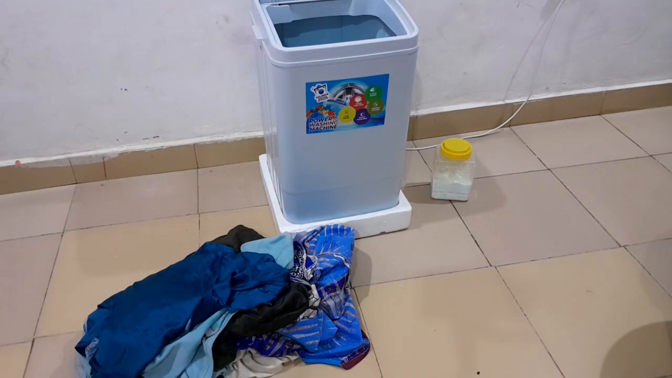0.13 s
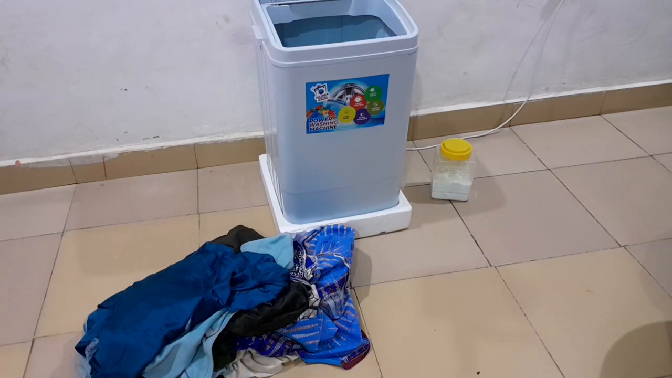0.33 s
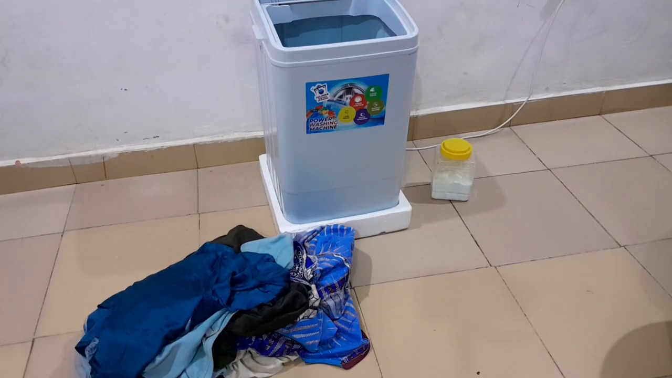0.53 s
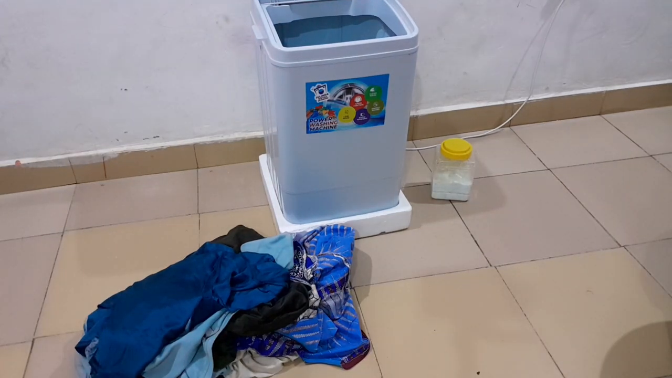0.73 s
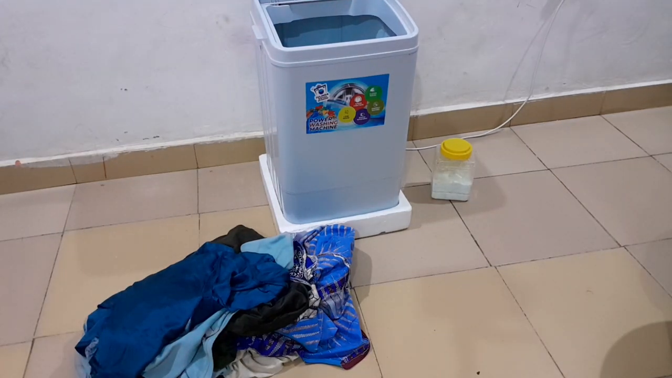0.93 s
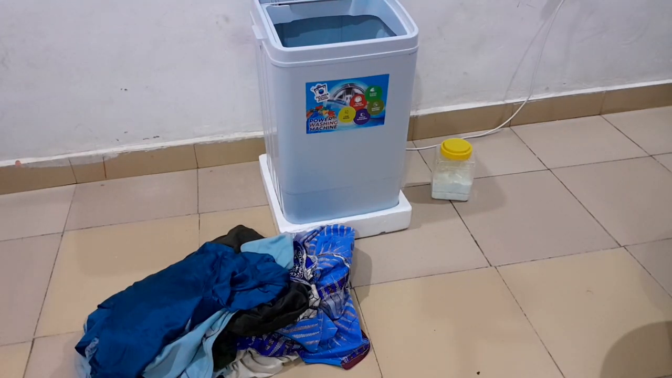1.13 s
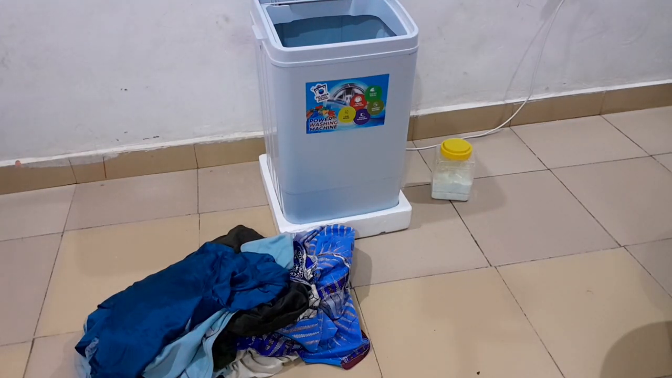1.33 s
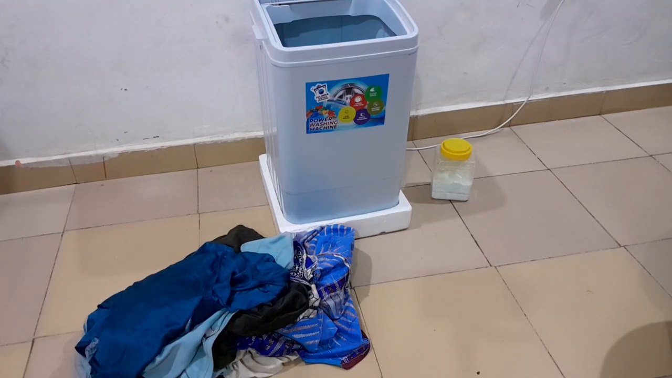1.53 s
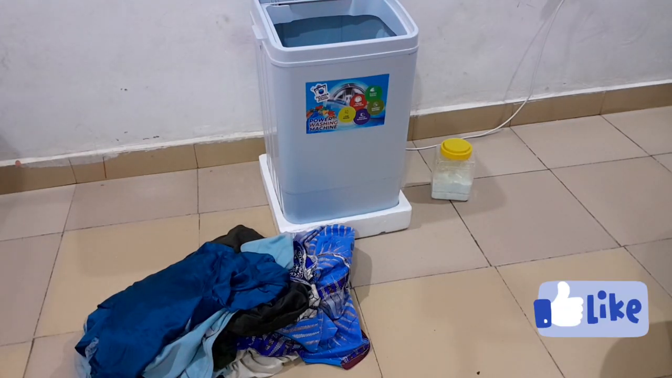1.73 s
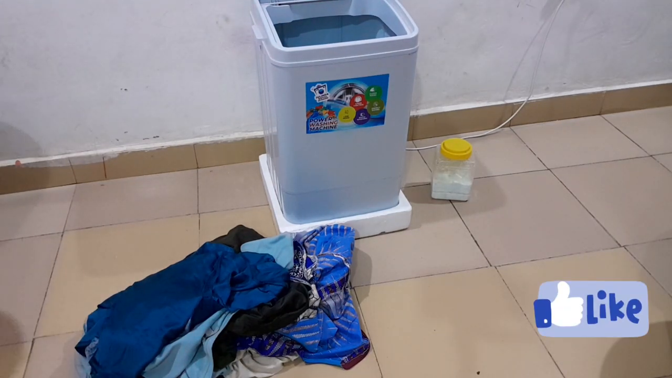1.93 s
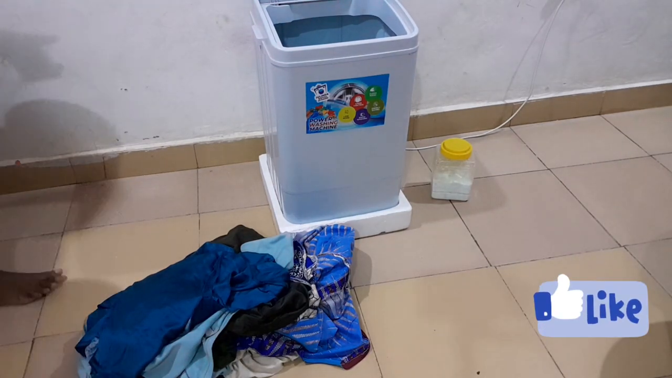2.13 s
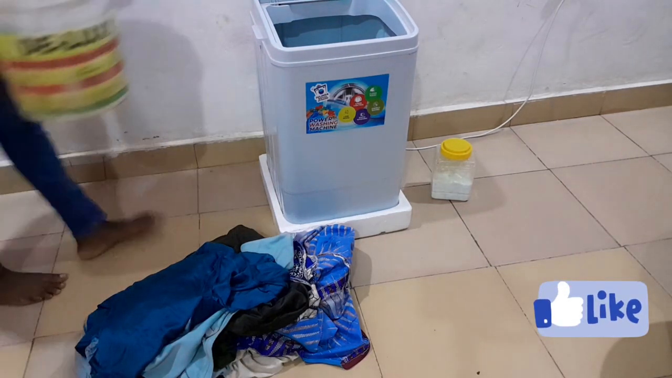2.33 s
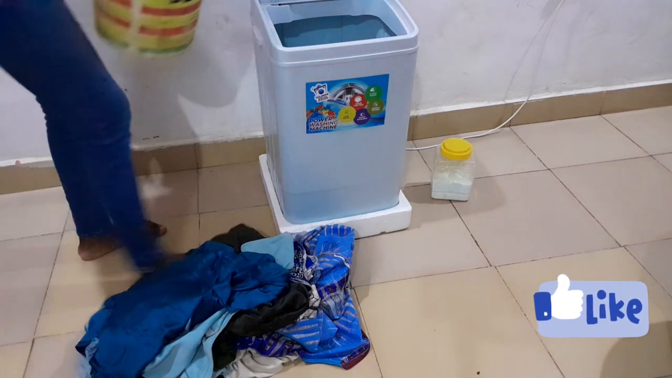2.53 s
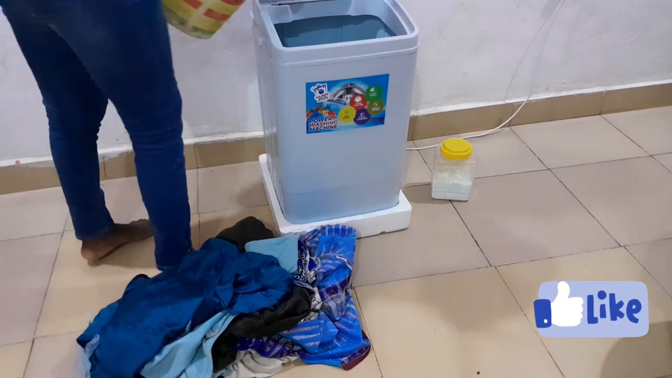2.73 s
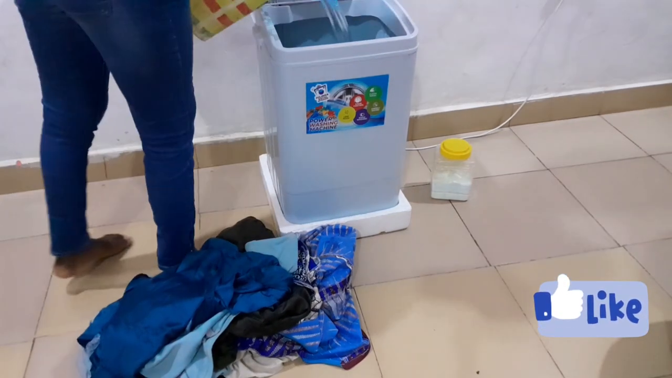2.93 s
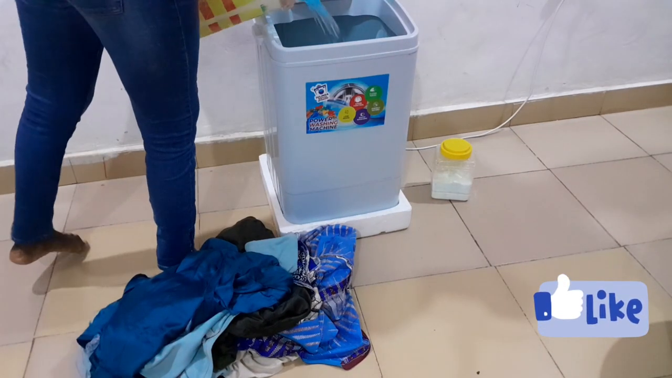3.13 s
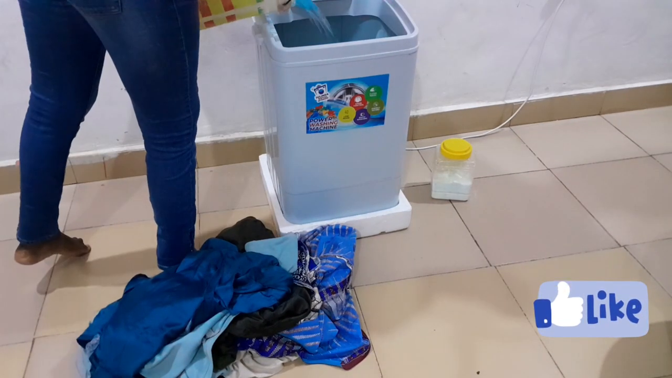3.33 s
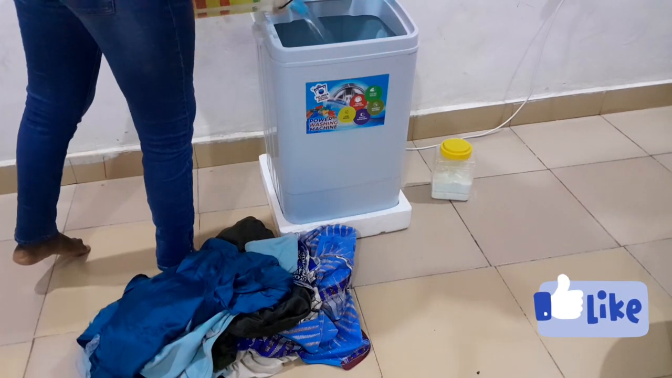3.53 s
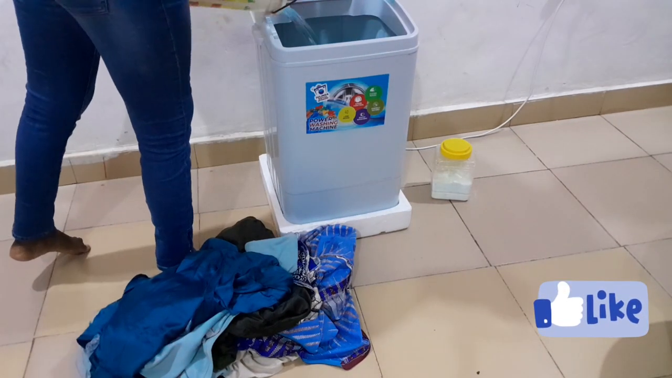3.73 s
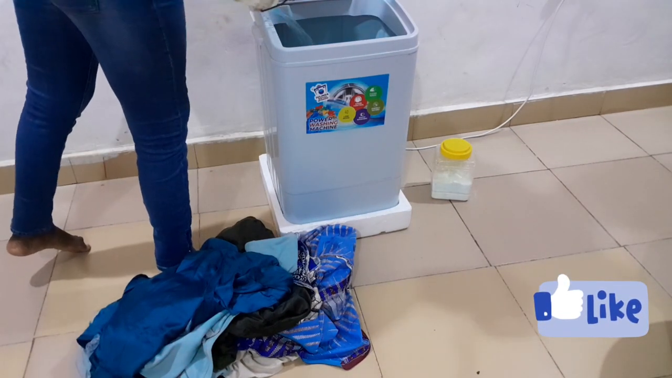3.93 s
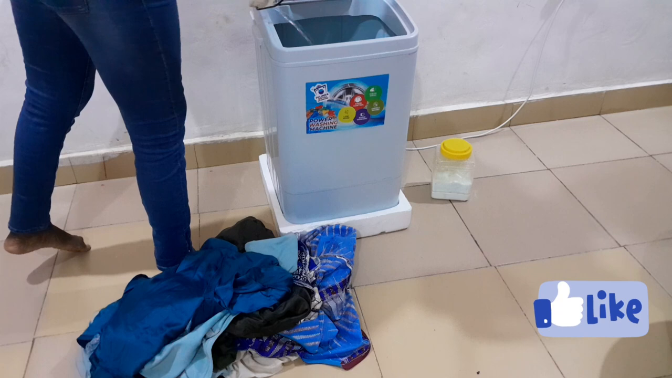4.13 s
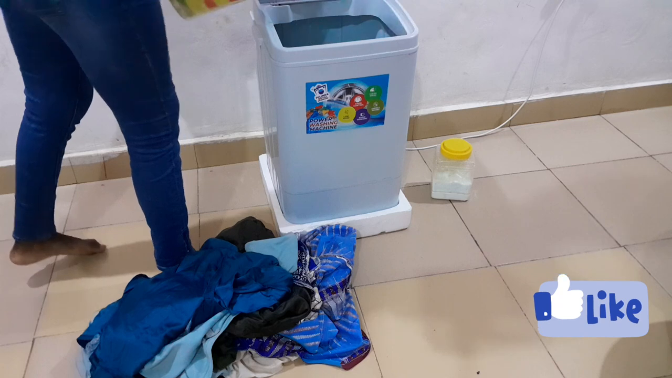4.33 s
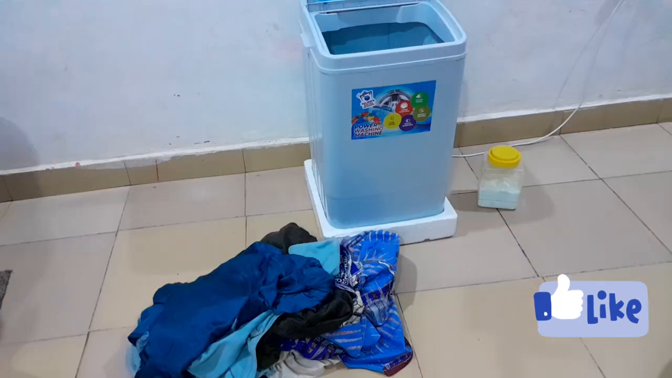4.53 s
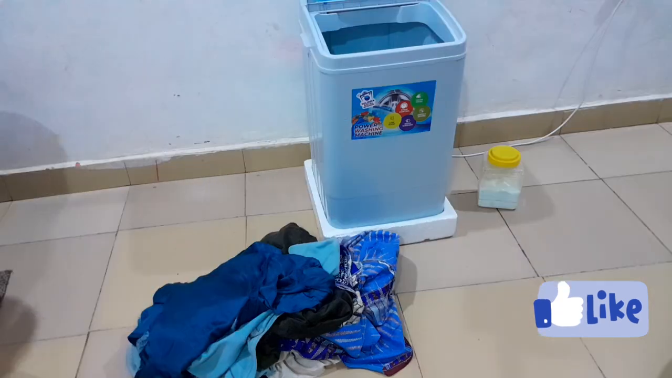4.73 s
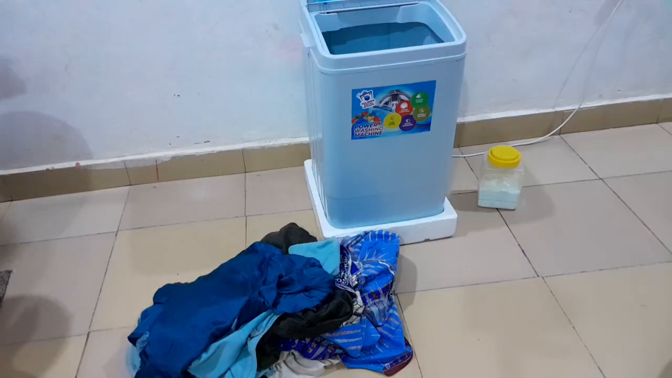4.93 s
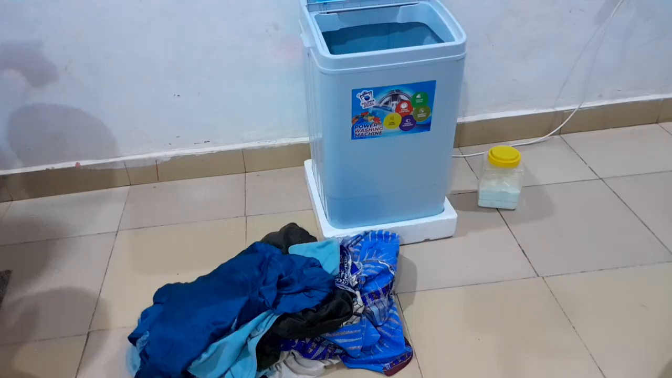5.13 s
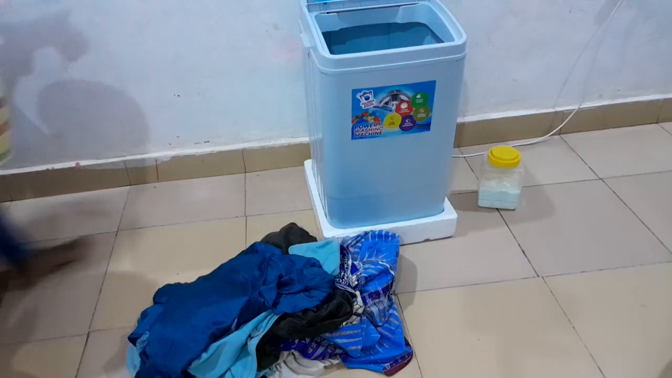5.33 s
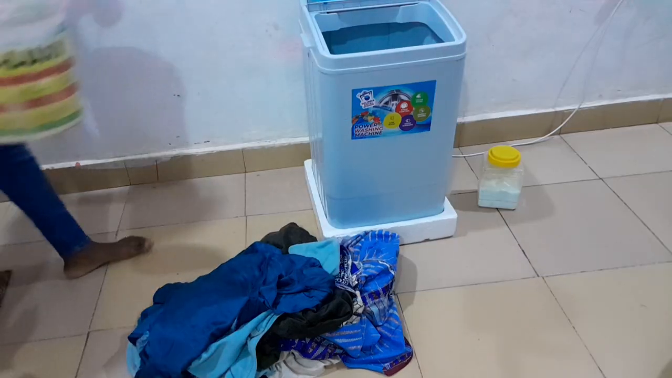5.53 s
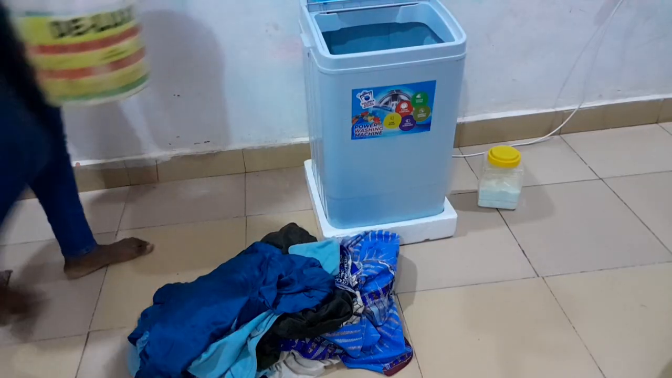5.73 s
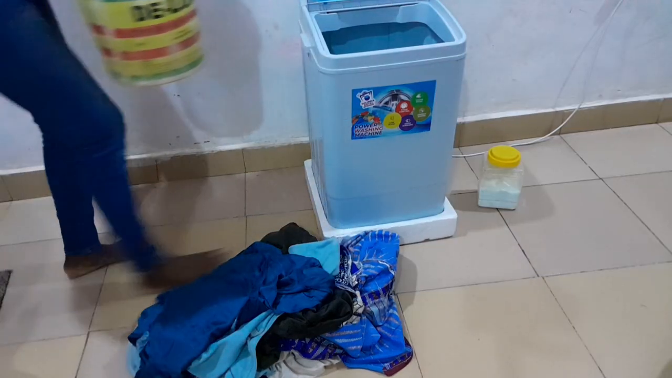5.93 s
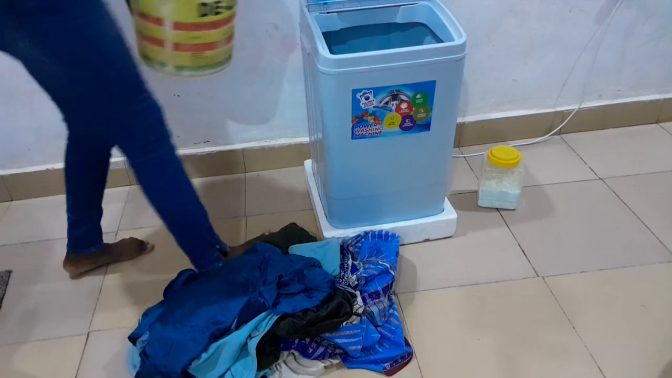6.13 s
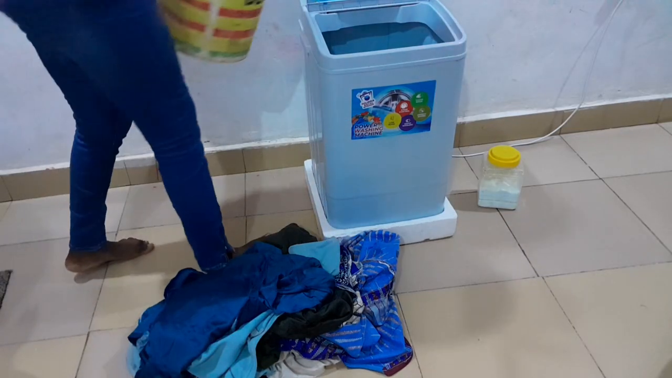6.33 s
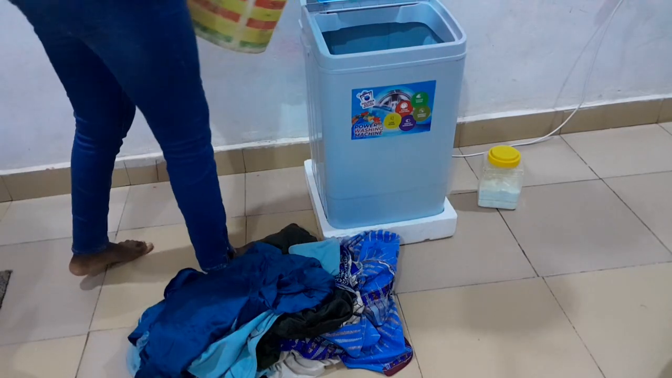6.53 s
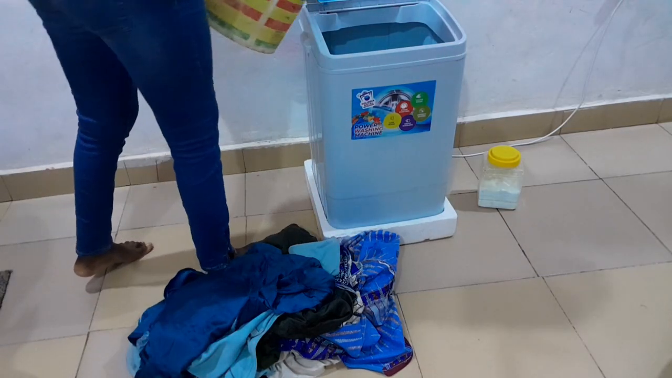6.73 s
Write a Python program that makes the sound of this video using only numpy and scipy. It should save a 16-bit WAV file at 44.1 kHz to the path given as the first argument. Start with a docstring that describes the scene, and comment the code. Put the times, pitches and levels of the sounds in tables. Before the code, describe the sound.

In an echoey tiled room, fabric rustles, water is quickly poured into a hollow washing tub, and the emptied bucket clatters before soft footsteps return.

```python
"""In a tiled room, a bucket of water is tipped into the plastic tub of a washing machine.
Before it, clothes brush by on the left (crackle, hiss and gliding harmonics), a scrape is heard
(filtered tiny slips) and bare feet thud on the floor (low swelling rings).
The pour is drumming, ringing bubbles and spray that follow one flow curve, with slaps and gulps.
Afterwards the bucket is scraped along and knocked about (noise bursts in its modes), and the steps return."""
import sys
import numpy as np
from scipy import signal
from scipy.fft import rfft, irfft, next_fast_len
from scipy.io import wavfile
from scipy.ndimage import map_coordinates

SR = 44100
rng = np.random.default_rng(int(sys.argv[2]) if len(sys.argv) > 2 else 0)


def pcm_store(signal):
    """Save signal as 16-bit PCM."""
    levels = np.round(np.clip(np.atleast_2d(signal), -1, 1) * 32767)
    wavfile.write(sys.argv[1], SR, levels.astype(np.int16).T)


N = 298557

# The stream swells at once and thins as the bucket empties, with one last surge.
# Each row: time in seconds, flow in dB.
FLOW = [(2.99, -43), (3.029, -1), (3.11, 0), (3.52, -0.5), (3.84, -2), (3.97, -11.5), (4.02, -5.5),
        (4.25, -10), (4.33, -18.5), (4.39, -18), (4.44, -33), (4.499, -33.5)]
# Stereo balance of sounds at the tub. Each row: frequency in Hz, left minus right in dB.
TUB_BALANCE = [(60, -3), (110, 0), (200, 0), (380, 2), (700, 2), (1290, 4.5), (2380, 4.5), (4400, 0.5),
               (8120, -2.5), (15000, -3.5)]
# Stereo balance of sounds close by on the left. Each row: frequency in Hz, left minus right in dB.
LEFT_BALANCE = [(60, 3), (110, 13), (200, 0), (380, 12), (700, 3), (1290, 4.5), (2380, 4.5), (4400, 1),
                (8120, -1.0), (15000, 0)]


def amp(db):
    """Decibels to gain."""
    return 10 ** (np.asarray(db) / 20)


def unit(x):
    """Scale to rms 1."""
    return x / np.sqrt(np.mean(x ** 2) + 1e-20)


def along(points, hz):
    """Read a curve of (Hz, value) points on a log frequency axis."""
    f, v = np.transpose(points)
    return np.interp(np.log(hz + 1), np.log(f + 1), v)


def levels(rows):
    """A (seconds, dB) curve per sample, silent outside the rows."""
    return np.interp(np.arange(N) / SR, *np.transpose(rows), left=-200, right=-200)


def wobble(rate):
    """A smooth random curve with rate knots a second."""
    knots = rng.standard_normal(int(N * rate / SR) + 4)
    return map_coordinates(knots, [np.arange(N) * rate / SR])


def filtered(x, response):
    """Multiply the spectrum of x by a complex response of frequency."""
    m = next_fast_len(N + SR // 2)
    return irfft(rfft(x, m) * response(np.fft.rfftfreq(m, 1 / SR)), m)[..., :N]


def coloured(x, spectrum):
    """Minimum-phase filter of unit energy, shaped by (Hz, dB) points."""
    size = 8192
    gain = amp(along(spectrum, np.fft.rfftfreq(size, 1 / SR)))
    # folding the cepstrum forward in time makes the filter causal
    cepstrum = irfft(np.log(np.maximum(gain, 1e-6)))
    cepstrum[1:size // 2] *= 2
    cepstrum[size // 2 + 1:] = 0
    kernel = irfft(np.exp(rfft(cepstrum)))
    kernel = kernel[None] / np.linalg.norm(kernel)
    return signal.fftconvolve(np.atleast_2d(x), kernel, axes=1)[:, :N]


def resonate(x, modes):
    """Pass x through parallel resonances of (Hz, width in Hz, dB)."""
    def response(f):
        return sum(amp(db) * 1j * f * w / (c * c - f * f + 1j * f * w) for c, w, db in modes)
    return filtered(x, response)


def add(track, s, sound):
    """Mix a sound into a track at time s in seconds."""
    part = track[..., max(round(s * SR), 0):][..., :sound.shape[-1]]
    part += sound[..., :part.shape[-1]]


def diffuse(pair):
    """Blend two unrelated signals into left and right with a likeness that varies with frequency."""
    # Stereo likeness of diffuse sound. Each row: frequency in Hz, left-right correlation.
    likeness = [(60, 0.22), (250, 0.96), (600, 0.68), (1300, 0.058), (3000, 0.034)]

    def mid_and_side(hz):
        turn = np.arccos(np.clip(along(likeness, hz), -1, 1)) / 2
        return np.array([np.cos(turn), np.sin(turn)])
    mid, side = filtered(pair, mid_and_side)
    return np.array([mid + side, mid - side])


def placed(x, balance, lag_ms, wet_db, early=1.55):
    """Set a source in the tiled room: direct sound, leading on the left, plus early walls and a tail."""
    # Decay of the room. Each row: frequency in Hz, time to fall by 60 dB in seconds.
    decay_times = [(100, 1), (500, 0.43), (2000, 0.54), (5000, 0.29), (9000, 0.29), (15000, 0.28)]
    hz, t, z = signal.stft(rng.standard_normal((2, SR)), SR, nperseg=256)
    decay = amp(-60 * t / along(decay_times, hz)[:, None])
    decay = decay * (1 + early * np.exp(-t / 0.0033))  # early walls
    z = z * decay / np.linalg.norm(decay, axis=1, keepdims=True)
    tail = signal.istft(z, SR, nperseg=256)[1]
    tail = tail / np.linalg.norm(tail[0])
    tail = np.pad(tail, ((0, 0), (SR // 600, 0)))  # gap ahead of the first wall
    echo = diffuse(signal.fftconvolve(np.atleast_2d(x), tail, axes=1)[:, :N])
    sides = np.array([[.5], [-.5]])
    direct = filtered(x, lambda f: np.exp(2j * np.pi * f * sides * lag_ms / 1000))
    both = (direct + amp(wet_db) * echo) / np.hypot(1, amp(wet_db))
    return filtered(both, lambda f: amp(sides * along(balance, f)))


def moving(x, balance, lag_ms, wet_db, count=3):
    """A shifting source meets ever new wall echoes: fade round a few versions of the room."""
    turn = np.arange(N) / SR / .13  # one version every 0.13 s

    def share(k):
        return np.sqrt(np.maximum(1 - abs((turn - k) % count - 1), 0))
    return sum(placed(x * share(k), balance, lag_ms, wet_db) for k in range(count))


def spread(make, apart):
    """A wide source: both channels hear a common part, and each its own."""
    share = np.clip(apart, 0, 1)
    return np.sqrt(1 - share) * make() + np.sqrt(share) * np.array([make(), make()])


def crackle(rate, spread_db):
    """Tiny random impacts of uneven size, rate a second on average, rms 1."""
    chance, size, sign = rng.random(N), rng.exponential(size=N), rng.standard_normal(N)
    hits = chance < rate / SR
    return unit(hits * amp(spread_db * np.minimum(size, 4)) * np.sign(sign))


def stroke(start, length, attack, release):
    """A smooth attack, a hold and an exponential release, timed in seconds."""
    age = np.arange(N) / SR - start
    swell = np.sin(np.pi / 2 * np.clip(age / attack, 0, 1)) ** 2
    return swell * np.exp(-np.maximum(age - length, 0) / release)


def strokes(rows, attack, release):
    """The joint gain of (start, length, dB) strokes, summed as power."""
    return np.sqrt(sum((amp(db) * stroke(s, length, attack, release)) ** 2 for s, length, db in rows))


def room_noise():
    """The dull steady air of the house: shaped noise that wavers slowly."""
    # Colour of the air. Each row: frequency in Hz, level in dB.
    air_colour = [(88, -38.5), (150, -5.5), (259, -3.5), (315, -3), (474, -9), (610, -13.5), (673, -6.5),
                  (771, -9), (866, -9), (1070, -16.5), (1330, -12.5), (1520, -20), (2300, -19.5),
                  (2790, -42.5), (15800, -37)]
    air = unit(diffuse(coloured(rng.standard_normal((2, N)), air_colour)))
    return air * amp(-61 + 1.3 * wobble(3.9)) * amp([[1], [-1]])  # a little to the left


def weave(rate, width_hz, between_db, slope_db, count=20):
    """Ribs of cloth tick past: fuzzy harmonics of their rate, and lines between as alternate ribs differ."""
    # Tone of the zip. Each row: frequency in Hz, level in dB.
    zip_colour = [(600, -12), (1300, 0.5), (2400, 4), (3600, 2), (6000, 11), (8500, -24), (14000, -16.5)]
    t = np.arange(len(rate)) / SR
    phase = 2 * np.pi * np.cumsum(rate * (1 + 0.0081 * wobble(120)[:len(t)])) / SR

    def fuzz():
        return np.interp(t * width_hz, np.arange(SR), rng.standard_normal(SR))
    tone = 0
    for k in range(2, count + 1):  # in half harmonics: odd k lies between the ribs' own
        line_db = along(zip_colour, rate * k / 2) + between_db * (k % 2) + slope_db * np.log2(k / 2)
        line = fuzz() * np.cos(k * phase / 2) + fuzz() * np.sin(k * phase / 2)
        tone = tone + amp(line_db) * line
    return unit(tone)


def brushing():
    """Cloth slides by: a swish of fibres, plus a fine hiss and a gliding zip that arch over each part."""
    # Successive parts of the cloth's strokes. Each row: start in seconds, length in seconds,
    # swish in dB, fine hiss in dB, zip in dB, zip tilt in dB per octave, ribs passing per second
    # at the start, and at the end. Levels stand ahead of the trims below.
    brush_parts = [(-.005, .135, -49, -57.5, -51, 0.5, 1297, 1350),
                   (0.116, 0.14, -53.5, -47.5, -50, -5.5, 1564, 1333),
                   (.23, .12, -54, -45.5, -48, -5.5, 1217, 1156),
                   (0.347, 0.14, -48.5, -53.5, -54, -11, 1119, 860),
                   (0.573, 0.14, -54.5, -60, -54.5, 0, 765, 782),
                   (0.703, .1, -54.5, -51.5, -47, 0, 827, 1228),
                   (.835, 0.072, -56.5, -60, -54.5, -5, 1618, 1634),
                   (0.933, 0.2, -64.5, -74, -71, -6, 995, 902),
                   (1.098, 0.2, -65, -79.5, -66, -7.5, 947, 642)]
    # Colour of the swish. Each row: frequency in Hz, level in dB.
    cloth_colour = [(180, -48), (300, -3), (509, -6), (826, 1), (942, -11), (1170, -4.5), (1600, -4),
                    (2340, -6), (3180, -1.5), (10000, -6.5), (13000, -15), (22000, -120)]
    # Colour of the fine hiss. Each row: frequency in Hz, level in dB.
    hiss_colour = [(4410, -18.5), (7500, -8), (8360, -5.5), (9040, -18), (13400, -7), (15800, -19.5)]
    attack_s, release_s = 0.038, 0.015
    hiss_arch_db, zip_arch_db = 8, 1.5  # how much weaker at the ends of a part than in its middle
    swish, hiss, zipping = np.zeros((3, N))
    for s, length, swish_db, hiss_db, zip_db, tilt_db, first_hz, last_hz in brush_parts:
        contact = stroke(s, length, attack_s, release_s)
        progress = np.clip((np.arange(N) / SR - s) / length, 0, 1)
        off_middle = (2 * progress - 1) ** 2
        swish += contact * amp(swish_db)
        hiss += contact * amp(hiss_db - hiss_arch_db * off_middle)
        span = slice(max(round(s * SR), 0), round((s + 2 * length) * SR))
        rate = first_hz * (last_hz / first_hz) ** progress[span]
        zip_gain = contact * amp(zip_db - zip_arch_db * off_middle)
        zipping[span] += zip_gain[span] * weave(rate, width_hz=75, between_db=-7.5, slope_db=tilt_db)
    fibre_noise = spread(lambda: crackle(rate=13000, spread_db=-0.5), apart=0.71)
    hiss_noise = spread(lambda: rng.standard_normal(N), apart=1.0)
    fibres = amp(1.5) * swish * unit(coloured(fibre_noise, cloth_colour))
    fibres += amp(2.0) * hiss * unit(coloured(hiss_noise, hiss_colour))
    cloth = fibres * amp(0.77 * wobble(33.3)) + zipping
    return placed(cloth, LEFT_BALANCE, lag_ms=0.406, wet_db=0.0)


def thuds():
    """Steps and bumps shake the floor: low swelling rings with a weak overtone, over a restless rumble."""
    # Dull thuds through the floor. Each row: start in seconds, level in dB ahead of a trim,
    # pitch in Hz, swell time in seconds, left minus right in dB.
    thud_rows = [(0.082, -32.5, 98.3, 0.014, 25.5), (0.36, -42, 62, 0.043, 24),
                 (0.545, -36.5, 65, 0.024, 19), (0.851, -28.5, 71.8, 0.024, 4),
                 (0.86, -34.5, 133.4, 0.018, 0), (1.513, -41.5, 93, 0.017, 20),
                 (1.779, -30.5, 67, 0.033, 10), (2.031, -35.5, 64.3, 0.014, 11),
                 (2.276, -40.5, 65.7, 0.022, 18), (2.756, -29, 82, 0.016, 16.5),
                 (2.888, -33.5, 83, 0.015, 18), (4.475, -34, 71, 0.024, 22), (4.763, -17.5, 71.2, 0.03, 0),
                 (4.84, -19, 77.5, 0.0086, 3), (5, -32, 59.8, 0.022, 16.5), (5.115, -16.5, 78.4, 0.016, 0),
                 (5.186, -23.5, 71, 0.016, 2), (5.29, -25.5, 68, 0.013, 11), (5.378, -26.5, 68.6, 0.027, 6),
                 (5.689, -36.5, 66.5, 0.028, 17)]
    # Spells in which the floor keeps shaking. Each row: start in seconds, length in seconds, level in dB.
    shakes = [(.08, .53, -49), (1.48, 1.15, -48.5), (3.0, 1.31, -47), (4.74, 0.963, -41),
              (5.78, 0.34, -54.5), (6.18, 0.245, -46)]
    # Colour of the rumble. Each row: frequency in Hz, level in dB.
    boom_colour = [(13, -45), (22, -28), (42, -5), (64, 0.5), (83, -5), (151, -21), (220, -29),
                   (290, -50.5), (480, -120)]
    attack_s, release_s, rest_db, swing_db = 0.017, 0.044, -55, 2
    floor, t = np.zeros((2, N)), np.arange(SR // 3) / SR
    for s, db, hz, swell, pan in thud_rows:
        age = t / swell
        phase = 2 * np.pi * hz * t + 0.47 * wobble(75)[:len(t)]
        push = (age * np.exp(1 - age)) ** 2
        overtone = 0.23 * push ** 2 * np.sin(1.9 * phase)
        thud = amp(db - 4.5) * (push * np.sin(phase) + overtone)
        add(floor[0], s, amp(pan / 2) * thud)
        add(floor[1], s, amp(-pan / 2) * thud)
    shaking = np.hypot(strokes(shakes, attack_s, release_s), amp(rest_db))
    boom = unit(diffuse(coloured(rng.standard_normal((2, N)), boom_colour)))
    rumble = shaking * amp(swing_db * wobble(12)) * boom
    return floor + rumble * amp([[2.4], [-2.4]])


def bucket():
    """Each contact is a short crunching rattle in the plastic; low bumps of the whole body are mixed in."""
    # Sharp contacts of bucket and handle. Each row: start in seconds, level in dB ahead of a trim,
    # decay time of the rattle in seconds.
    knocks = [(1.165, -35, 0.0019), (1.795, -37, 0.0064), (1.933, -38.5, 0.0067), (4.754, -25, 0.04),
              (4.833, -24, 0.022), (4.907, -26, .012), (5.0, -45.5, .03), (5.096, -29, 0.066),
              (5.181, -20.5, 0.0099), (5.191, -18.5, 0.0061), (5.211, -28, 0.021), (5.354, -44.5, 0.029),
              (5.478, -49.5, .042), (5.579, -37.5, 0.018)]
    # Low bumps of the bucket. Each row: start in seconds, level in dB ahead of the filter.
    bump_rows = [(4.772, -25), (4.849, -35.5), (5.119, -20), (5.145, -26), (5.19, -36.5), (5.24, -42),
                 (5.373, -36.5), (5.59, -44)]
    # Colour of the rattle. Each row: frequency in Hz, level in dB.
    clack_colour = [(240, -37), (400, 3.5), (425, -6.5), (752, -6), (824, -9.5), (918, -4.5), (1570, -7),
                    (2040, -8), (4760, -8), (5300, -10), (6280, -10.5), (8280, -10.5), (15800, -22)]
    # Colour of the bumps. Each row: frequency in Hz, level in dB.
    bump_colour = [(50, -25), (90, 0), (135, -4), (175, -11), (250, -5.5), (340, -7.5), (480, -14),
                   (620, -18), (760, -18), (1000, -24.5), (1600, -28), (3300, -48)]
    # The bucket's modes. Each row: frequency in Hz, width in Hz, level in dB ahead of a trim.
    plastic_modes = [(2100, 160, -2.5), (3320, 1400, -10.5), (5250, 110, 11.5), (8130, 440, 0.5)]
    # Stereo balance of the bucket. Each row: frequency in Hz, left minus right in dB.
    bucket_balance = [(60, 5), (110, -9.5), (200, 8), (380, -3), (700, 8), (1290, 0.5), (2380, 4.5),
                      (4400, 1), (8120, -2), (15000, -1)]
    rise_share = .2  # build-up time of a rattle as a share of its decay time
    cracks, bumps, t = np.zeros((2, N)), np.zeros(N), np.arange(SR // 3) / SR

    def crunch():
        return rng.standard_normal(len(t)) * amp(2.9 * rng.standard_normal(len(t)))
    for s, db, length in knocks:
        rattle = spread(crunch, apart=0.47)
        envelope = np.exp(-t / length) * (1 - np.exp(-t / (rise_share * length)))
        gain = amp(db - 8.5 + 2.9 * wobble(246.3)[:len(t)])
        add(cracks, s, gain * rattle * envelope)
    for s, db in bump_rows:
        envelope = np.exp(-t / 0.014) * (1 - np.exp(-t / 0.003))
        add(bumps, s, amp(db) * rng.standard_normal(len(t)) * envelope)
    clack = coloured(cracks, clack_colour)
    ringing = resonate(clack, plastic_modes)
    body = amp(0.5) * clack + amp(-2.5) * ringing + coloured(bumps, bump_colour)
    return moving(body, bucket_balance, lag_ms=0.396, wet_db=3)


def rubbing(spectrum, rate):
    """Friction: dense little slips, rms 1."""
    return unit(coloured(spread(lambda: crackle(rate, spread_db=5.0), apart=0.96), spectrum))


def scraping():
    """Gritty strokes over the tiles on the left, some brighter, and the soft rustle of walking legs."""
    # Scraping strokes. Each row: start in seconds, length in seconds, level in dB, extra treble in dB.
    scrapes = [(1.305, 0.09, -51.5, 0), (1.387, 0.11, -55.5, 2), (1.481, 0.3, -52, 6.5),
               (1.816, 0.027, -46, -7), (1.916, 0.029, -52, -6), (4.48, 0.15, -49.5, -6),
               (4.632, .14, -48.5, 0.5)]
    # Colour of the scrape. Each row: frequency in Hz, level in dB.
    scrape_colour = [(290, -13), (500, -0.5), (639, 2), (1090, -5.5), (1190, -0.5), (1300, -7.5),
                     (1520, -4), (2790, -3), (3320, -5), (4560, -4), (6830, -11), (8010, -3.5), (9390, -17),
                     (13300, -15.5), (15800, -30)]
    # Trouser legs rustling with the steps. Each row: start in seconds, length in seconds,
    # level in dB ahead of a boost.
    rustles = [(2.0, 0.23, -88), (2.21, 0.076, -73.5), (2.355, 0.033, -63.5), (2.42, 0.073, -80.5),
               (2.55, 0.063, -65.5), (2.75, 0.033, -77), (2.89, 0.033, -81), (5.65, 0.1, -69.5),
               (5.78, 0.13, -77.5), (5.9, 0.033, -80), (5.98, 0.065, -74), (6.05, 0.1, -72),
               (6.15, 0.098, -75.5), (6.26, 0.15, -83.5)]
    # Colour of the rustle. Each row: frequency in Hz, level in dB.
    rustle_colour = [(530, -5), (900, -6.5), (991, -26), (1140, -2), (1290, -8.5), (3250, -20),
                     (12400, -22.5), (15800, -30)]
    attack_s, release_s, treble_hz = 0.04, 0.021, 6500
    grit, bright = np.zeros((2, N))
    for s, length, db, extra_db in scrapes:
        contact = stroke(s, length, attack_s, release_s)
        grit += amp(db) * contact
        bright += amp(db + extra_db) * contact
    slips = rubbing(scrape_colour, rate=7000)
    body = filtered(slips, lambda hz: 1 / (1 + (hz / treble_hz) ** 6))
    treble = slips - body
    tiles = placed(grit * body + bright * treble, LEFT_BALANCE, lag_ms=0.422, wet_db=-4)
    rustle = strokes(rustles, attack=0.017, release=0.02) * rubbing(rustle_colour, rate=7000)
    return tiles + placed(amp(11) * rustle, TUB_BALANCE, lag_ms=0.22, wet_db=-4.0)


def bubbles(centre_hz, octaves, cycles, rise, spread_db, count):
    """Ringing bubbles, rms 1 over the pour; each climbs in pitch as it nears the surface."""
    first, last = FLOW[0][0], FLOW[-1][0]
    start = rng.uniform(first, last, (count, 1))
    hz = np.clip(centre_hz * 2 ** (octaves * rng.standard_normal((count, 1))), 450, 9000)
    size = amp(spread_db * np.minimum(rng.exponential(size=(count, 1)), 3)) * np.sqrt(hz)
    turns = hz * np.arange(SR // 16) / SR
    age = turns / cycles  # each bubble dies away over the same number of cycles
    tone = np.sin(2 * np.pi * turns * (1 + rise * np.minimum(age, 5) / 2))
    ring = size * tone * np.exp(-age) * (1 - np.exp(-2 * turns))
    where = (start * SR).astype(int) + np.arange(SR // 16)
    froth = np.bincount(where.ravel(), ring.ravel(), N)[:N]
    return unit(froth) * np.sqrt((last - first) * SR / N)


def stream():
    """Gains of drumming, bubbles, spray and hollow ring: all follow the flow."""
    drum_db, churn_db, spray_db, hollow_db = -43, -39, -46, -43.5  # at 0 dB flow, ahead of swings and trims
    drum_grows, churn_grows, spray_grows, hollow_grows = 0.69, 1.13, .6, 0.8  # dB per dB of flow
    # the hollow rings best midway, and is this much weaker a span away
    hollow_at_s, hollow_span_s, hollow_away_db = 3.75, 0.57, 9
    flow = levels(FLOW)
    away = ((np.arange(N) / SR - hollow_at_s) / hollow_span_s) ** 2
    drum = amp(drum_db + drum_grows * flow + 2.2 * wobble(14))
    churn = amp(churn_db + churn_grows * flow)
    spray = amp(spray_db + spray_grows * flow)
    hollow = amp(hollow_db + hollow_grows * flow - hollow_away_db * away + 2.5 * wobble(20))
    return drum, churn, spray, hollow


def pour():
    """The stream drums on the tub, churns bubbles in its hollow and throws spray."""
    # Colour of the bubbling wash. Each row: frequency in Hz, level in dB.
    wash_colour = [(180, -40), (300, -21.5), (448, -30), (527, -11), (590, -12), (904, -10), (987, -15),
                   (1440, -5), (1610, -10.5), (2620, -10.5), (6000, -14.5), (7800, -54), (13200, -120)]
    # Colour of the spray. Each row: frequency in Hz, level in dB.
    spray_colour = [(1470, -24), (2500, -5), (5800, -6), (8140, -4), (9420, -8), (12900, -9),
                    (15100, -13.5), (15800, -15)]
    # Colour of the drumming. Each row: frequency in Hz, level in dB.
    drum_colour = [(53, -32), (90, -12.5), (129, 7), (173, -0.5), (240, 0.5), (280, -8.5), (329, -5.5),
                   (420, -9), (550, -50), (920, -120)]
    # Air resonances of the tub. Each row: frequency in Hz, width in Hz, level in dB ahead of a trim.
    tub_modes = [(782, 200, -3), (872, 81, -3), (1135, 13, -3), (1157, 52, -2), (1230, 51, -6),
                 (1414, 46, -23), (2240, 15, -36), (2340, 31, -3), (2710, 75, -3)]
    # The tub's strongest resonance. Each row: frequency in Hz, width in Hz, level in dB.
    hollow_mode = [(535, 22, 0)]
    # Lumps of water landing. Each row: start in seconds, slap in dB, spray in dB, both ahead of trims.
    slap_rows = [(3.024, -24, -55), (3.117, -20.5, -31.5), (3.279, -22.5, -30.5), (3.465, -20, -38.5),
                 (3.533, -26, -45.5), (3.679, -30, -34.5), (4.001, -37, -49), (4.026, -25.5, -36.5),
                 (4.187, -36.5, -38.5), (4.375, -32.5, -46.5)]
    # Short spatters of spray as the stream thins. Each row: start in seconds, level in dB ahead
    # of the spray filter.
    late_spatters = [(4.255, -41.5), (4.302, -48), (4.325, -48), (4.464, -49.5)]
    # Single gulps of trapped air. Each row: start in seconds, pitch in Hz, level in dB ahead of
    # the envelope, decay time in seconds.
    gulp_rows = [(3.022, 777, -36.5, 0.021), (3.11, 895, -32.5, 0.0098), (3.46, 535, -29, 0.013),
                 (3.61, 1463, -40, 0.016), (3.64, 707, -38, 0.0094), (3.715, 1420, -35, 0.009),
                 (3.997, 539, -41, 0.04), (4.002, 906, -31, 0.0082), (4.385, 554, -48, 0.013)]
    drum, churn, spray, hollow = stream()
    froth = bubbles(centre_hz=1590.5, octaves=.8, cycles=14.5, rise=0.0347, spread_db=4.5, count=900)
    wash = unit(coloured(crackle(rate=1200, spread_db=3.0), wash_colour))
    water = churn * amp(1.3 * wobble(28.26)) * (amp(-4.0) * froth + amp(-4.5) * wash)
    droplets = spread(lambda: crackle(rate=1700, spread_db=1), apart=1.0)
    drops = spray * amp(1.63 * wobble(45)) * unit(coloured(droplets, spray_colour))
    slaps, spatter, gulps = np.zeros((3, N))
    t = np.arange(SR // 8) / SR
    for s, db, spray_db in slap_rows:
        envelope = np.exp(-t / 0.0094) * (1 - np.exp(-t / 0.0011))
        burst = envelope * rng.standard_normal((2, len(t)))
        add(slaps, s, amp(db - 12.0) * burst[0])
        add(spatter, s, amp(spray_db - 0.5) * burst[1])
    for s, db in late_spatters:
        add(spatter, s, amp(db) * np.exp(-t / 0.0057) * rng.standard_normal(len(t)))
    for s, hz, db, life in gulp_rows:
        envelope = np.exp(-t / life) * (1 - np.exp(-t / 0.0025))
        add(gulps, s, amp(db) * np.sin(2 * np.pi * hz * t) * envelope)
    slap_colour = [(120, -31.5), (300, 7.0), (560, -3), (1000, 1.0), (2500, -24.5), (8000, -44.5)]  # Hz, dB
    water = water + coloured(slaps, slap_colour)
    inside = amp(-2.0) * water + amp(-7.0) * resonate(water, tub_modes)
    inside = inside + drops + coloured(spatter, spray_colour) + gulps
    hollow_ring = unit(resonate(crackle(rate=500, spread_db=0.0), hollow_mode))
    drumming = unit(coloured(crackle(rate=400, spread_db=3), drum_colour))
    inside += amp(-1.0) * hollow * hollow_ring + amp(-2.5) * drum * drumming
    return moving(inside, TUB_BALANCE, lag_ms=0.049, wet_db=-1.0)


def scene():
    """Everything that sounds in the room."""
    return room_noise() + brushing() + thuds() + bucket() + scraping() + pour()


def record(dry):
    """The level dips once for an instant, and nothing at or above a band limit passes."""
    # The brief dip. Each row: time in seconds, level in dB.
    dip = [(4.5, 0), (4.505, -25), (4.511, -25), (4.525, 0)]
    top_hz = 15850
    gate = amp(np.interp(np.arange(N) / SR, *np.transpose(dip)))
    return filtered(dry * gate, lambda hz: hz < top_hz)


dry = scene()
out = record(dry)
pcm_store(out)
```